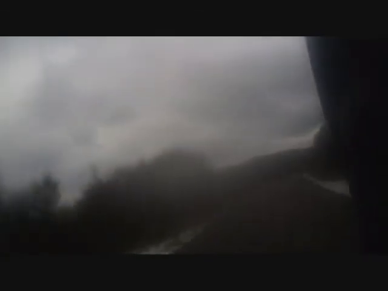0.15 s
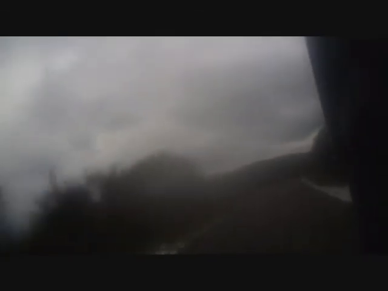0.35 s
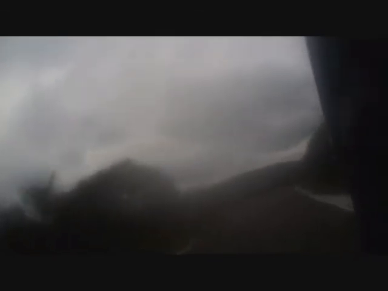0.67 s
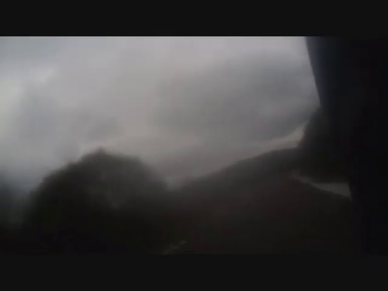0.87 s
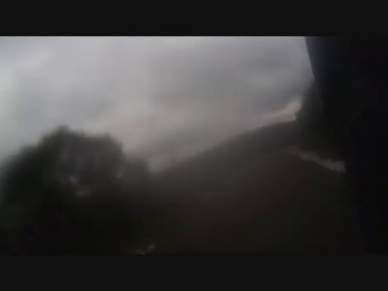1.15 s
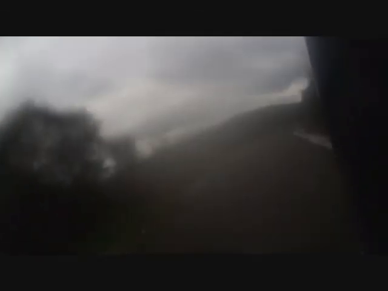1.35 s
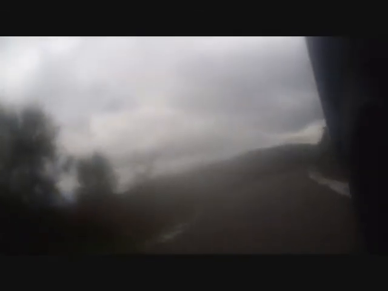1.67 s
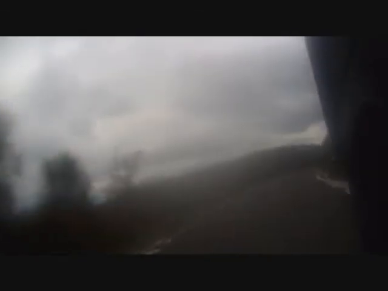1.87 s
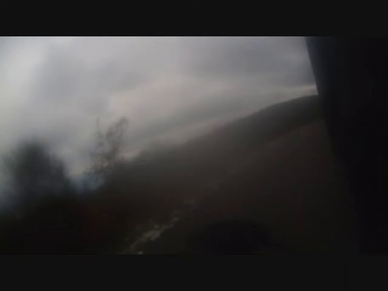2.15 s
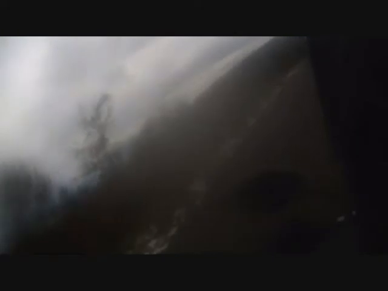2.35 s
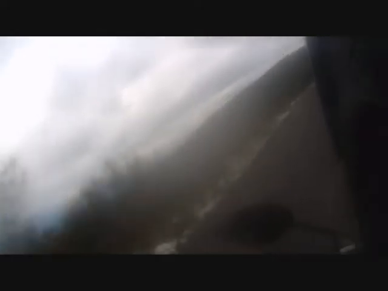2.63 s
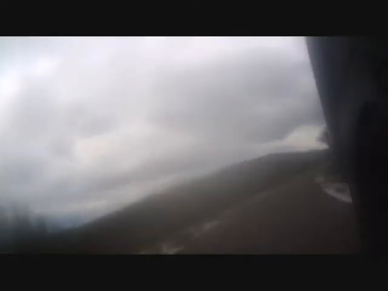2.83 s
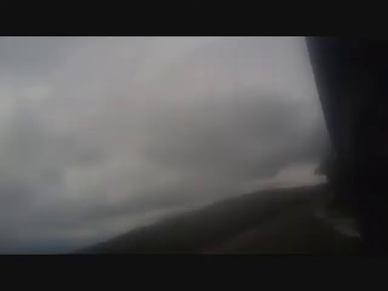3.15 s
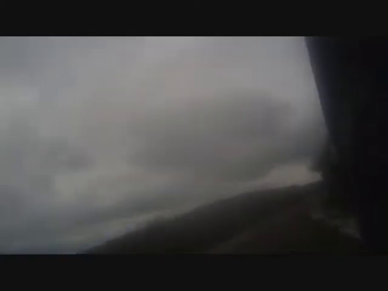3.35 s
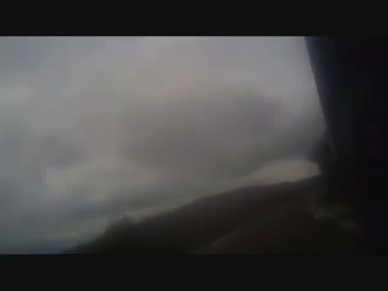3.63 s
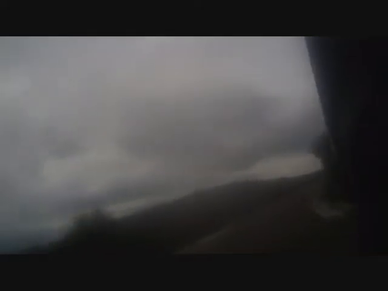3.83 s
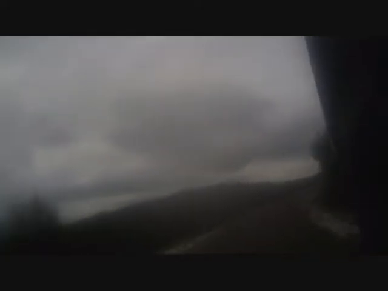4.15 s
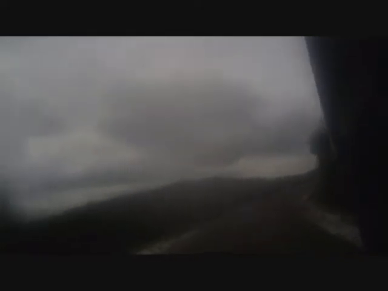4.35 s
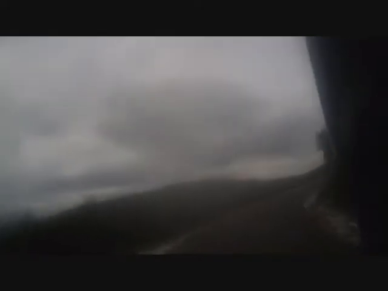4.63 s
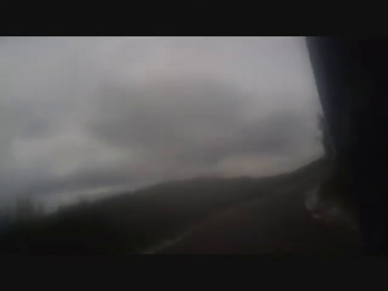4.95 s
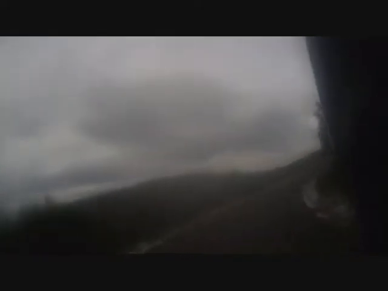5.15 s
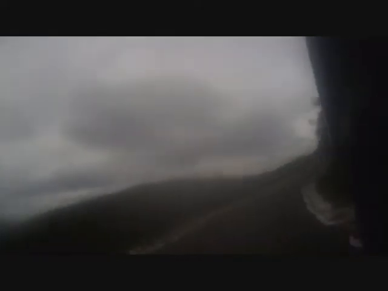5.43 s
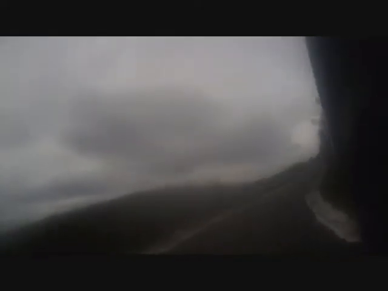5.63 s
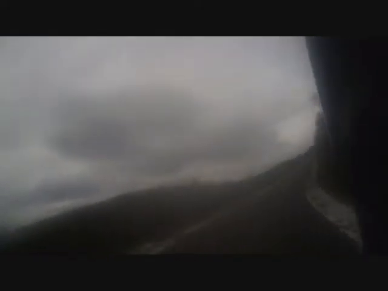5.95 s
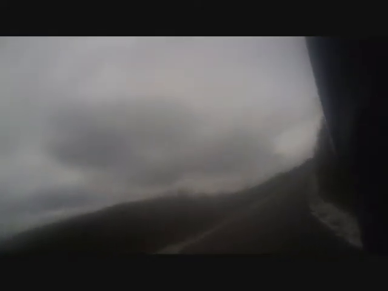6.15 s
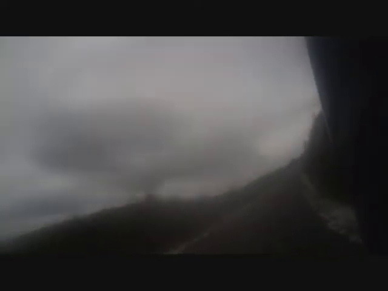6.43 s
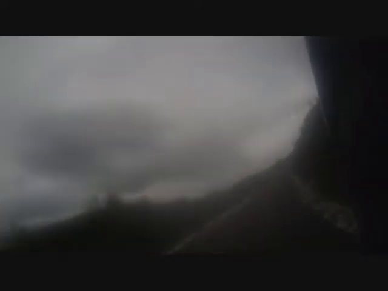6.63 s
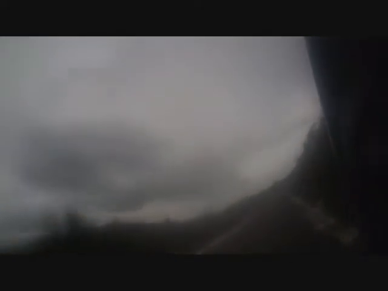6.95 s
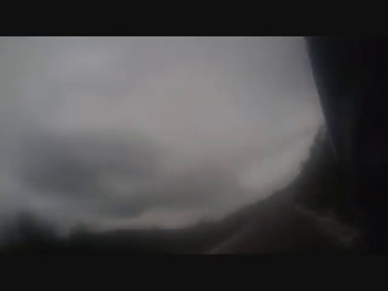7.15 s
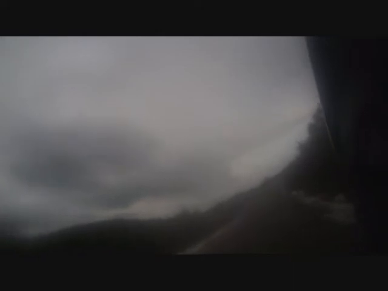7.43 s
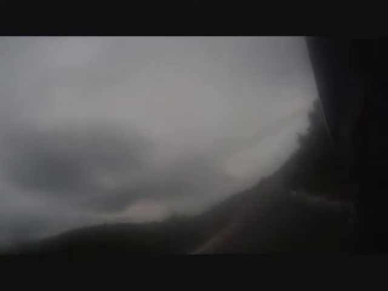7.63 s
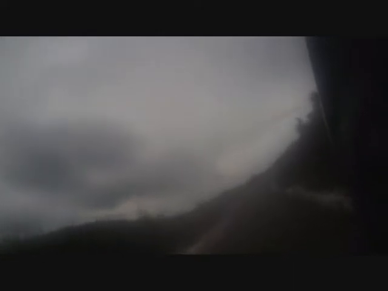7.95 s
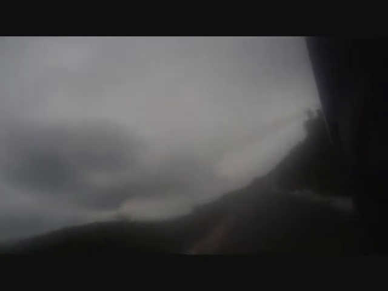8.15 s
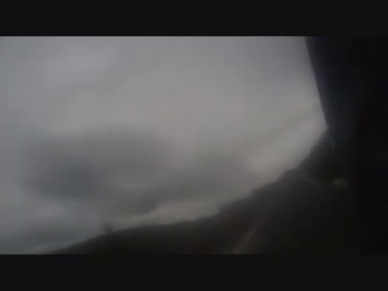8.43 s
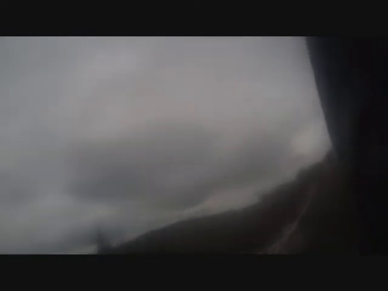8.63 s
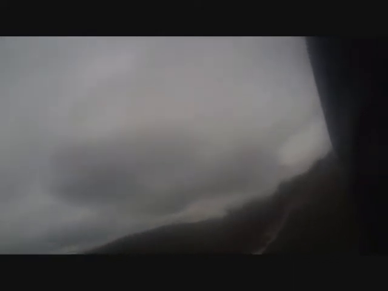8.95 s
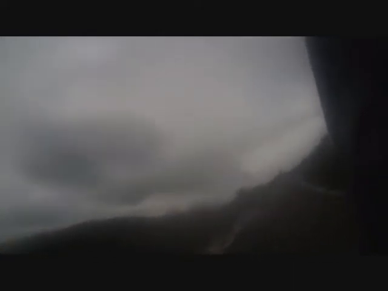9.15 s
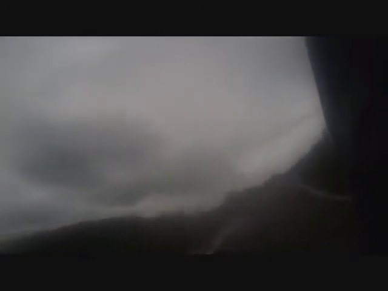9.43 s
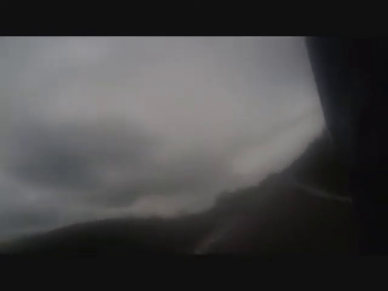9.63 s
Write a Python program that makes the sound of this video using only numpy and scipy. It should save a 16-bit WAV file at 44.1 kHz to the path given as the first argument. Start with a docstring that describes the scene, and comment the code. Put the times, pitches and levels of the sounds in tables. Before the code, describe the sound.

Heard from inside a small closed camera case on a motorcycle riding a wintry road, the sound is close, boxy, mono and narrow-band. Sleet dominates: very short, hollow clicks around 1.7 kHz, crumbly slush crackles and fine ticking spray. Clusters strike at 0.1-0.3 s, around 1 s, and at 1.3-1.9 s. A faint soft gust swells at 2.2-2.9 s among sparse ticks. Hits return near 2.9 s, with a hard crackling flurry at 3.5-3.8 s. From 4 to 5.9 s the knocks are lighter and scattered. They build from 6 s, with sharp snaps at 6.2 and 6.8 s, becoming a dense, loud, distorted rattle from 7 to 8.6 s. It then thins to isolated clicks and small crunches until 9.8 s. Far beneath, a low engine hum climbs slowly, with wavering frame drone, road rumble and gently growing airflow.

```python
"""Sleet strikes the case of a small closed camera, mounted on a motorcycle that gathers speed on a wintry road.
Ice pellets, crumbling clumps of slush and fine spray are short knocks that ring the case near 1.7 kHz;
they come thickest at about 7 to 8.5 s. Engine hum is made of sine waves, frame sway of one wandering sine,
and road rumble and airflow of coloured noise; all are faint beside the sleet.
The narrow-band recorder overloads on the hardest hits."""
import sys
import numpy as np
from scipy import signal
from scipy.fft import rfft, irfft, next_fast_len
from scipy.io import wavfile
from scipy.ndimage import map_coordinates

SR = 44100
rng = np.random.default_rng(int(sys.argv[2]) if len(sys.argv) > 2 else 0)


def waveform_to_disk(signal):
    """Save audio, clipped to [-1, 1], as 16-bit WAV at the path in sys.argv[1]."""
    frames = np.transpose(np.atleast_2d(signal))
    scaled = np.clip(frames, -1, 1) * 32767
    samples = np.round(scaled).astype(np.int16)
    wavfile.write(sys.argv[1], SR, samples)


N = 431277  # length of the scene in samples
RECORDER_HZ = 8000  # the recorder's own sample rate
TOP_HZ = 14700  # nothing is left above this at the output


def amp(db):
    """Turn decibels into a gain."""
    return 10 ** (np.asarray(db) / 20)


def unit(x):
    """Scale a sound to an rms of 1."""
    return x / np.sqrt(np.mean(x ** 2) + 1e-20)


def curve(rows):
    """Join (time [s], value) points with straight lines, one value per sample."""
    times, values = np.transpose(rows)
    return np.interp(np.arange(N) / SR, times, values)


def wobble(rate):
    """A smooth random curve through `rate` random points a second."""
    points = rng.standard_normal(int(N * rate / SR) + 4)
    return map_coordinates(points, [np.arange(N) * rate / SR])


def tone(hz):
    """A sine wave of rms 1 that follows a changing pitch."""
    return np.sqrt(2) * np.sin(2 * np.pi * np.cumsum(hz) / SR)


def filtered(x, response):
    """Multiply the spectrum of x by a response of frequency."""
    size = 2 * next_fast_len(N // 2 + SR // 4)  # spare room keeps the end from wrapping onto the start
    hz = np.fft.rfftfreq(size, 1 / SR)
    return irfft(rfft(x, size) * response(hz), size)[:N]


def gains(spectrum, hz):
    """Gain of a (frequency [Hz], level [dB]) spectrum, joined up on a log frequency axis."""
    table_hz, db = np.transpose(spectrum)
    return amp(np.interp(np.log(hz + 1), np.log(table_hz), db))


def noise(spectrum):
    """Noise of rms 1 with the colour of a spectrum."""
    return unit(filtered(rng.standard_normal(N), lambda hz: gains(spectrum, hz)))


def causal(gain):
    """The response with these gains that rings only after it is struck (minimum phase)."""
    cepstrum = irfft(np.log(gain))
    half = len(cepstrum) // 2
    cepstrum[1:half] *= 2
    cepstrum[half + 1:] = 0
    return np.exp(rfft(cepstrum))


def ringing_noise(centre_hz, width_hz):
    """Noise of rms 1 through one resonance, like a mode that is kept ringing."""
    def resonance(hz):
        damping = 1j * hz * width_hz
        return damping / (centre_hz ** 2 - hz ** 2 + damping)
    return unit(filtered(rng.standard_normal(N), resonance))


# How strongly the case rings at each pitch: (frequency [Hz], relative level [dB])
CASE_RESPONSE = [(300, -36), (970, -36.5), (1085, -22.5), (1240, -32), (1520, -2.5), (1700, 3), (1850, -8),
                 (2330, -30), (2490, -24), (2730, -41), (2980, -22), (3330, -24), (3530, -31.5),
                 (4000, -24.5)]


def case(hz):
    """Ringing response of the struck case, within the recorder's band."""
    return causal(gains(CASE_RESPONSE, hz)) * (hz < RECORDER_HZ / 2)


# Engine speed: (time [s], firing rate [Hz])
ENGINE_SPEED = [(0, 120.6), (1.5, 125), (2.8, 127.1), (4, 126.7), (5.2, 133.4), (6, 136.1), (7, 141.6),
                (8, 146.5), (9.78, 150)]


def firing_rate():
    """How many times a second the engine fires; this sets the pitch of its hum."""
    return curve(ENGINE_SPEED)


# Partial tones of the hum: (multiple of the firing rate, level [dB])
HUM_TONES = [(.5, -68), (1, -60.5), (2, -73.5)]


def engine_hum(waver_db=2.0):
    """Each firing pushes the air, so the engine hums at multiples of its firing rate."""
    firing_hz = firing_rate()
    hum = np.zeros(N)
    for multiple, db in HUM_TONES:
        hum += amp(db + waver_db * wobble(6)) * tone(multiple * firing_hz)
    return hum


# Sway of the frame on its mount: (time [s], level [dB])
FRAME_SWAY = [(0, -54.5), (0.8, -48.5), (1.2, -55), (2.0, -47), (2.6, -57), (2.92, -41.5), (3.15, -60.5),
              (3.9, -49.5), (4.8, -59.5), (5.15, -44.5), (5.4, -65), (6.2, -45.5), (6.75, -48.5),
              (7.3, -50), (8.4, -50), (8.92, -43), (9.55, -48.5), (9.78, -45.5)]


def frame_sway(frame_hz=58, wander_hz=3.5, waver_db=1.1):
    """The road sets the frame swaying at its own, slightly wandering pitch."""
    level_db = curve(FRAME_SWAY) + waver_db * wobble(7.1)
    return amp(level_db) * tone(frame_hz + wander_hz * wobble(6.7))


def air_level(start_db=-56.5, db_per_octave=12.5):
    """Base level in dB for air and road; it grows by db_per_octave as the engine speed doubles."""
    firing_hz = firing_rate()
    return start_db + db_per_octave * np.log2(firing_hz / firing_hz[0])


# Colour of the road rumble: (frequency [Hz], relative level [dB])
RUMBLE_COLOUR = [(15, -6), (38, -5), (55, 2), (72, 3), (95, -3), (150, -10), (400, -40)]


def road_rumble(above_base_db=2.0):
    """The road rumbles as low noise that grows with speed, as the airflow does."""
    return amp(air_level() + above_base_db) * noise(RUMBLE_COLOUR)


# Colour of the rushing air: (frequency [Hz], relative level [dB])
AIR_COLOUR = [(30, -0.5), (100, 9.5), (190, 9), (225, 10), (258, 16.5), (300, 6), (500, 3), (800, 2),
              (1080, 2), (1250, -2), (2500, -7.5), (3300, -1), (3900, -16.5)]


def air_rush(above_base_db=5, waver_db=1.9):
    """Turbulent air rushes past as noise that wavers and grows with speed."""
    return amp(air_level() + above_base_db + waver_db * wobble(13)) * noise(AIR_COLOUR)


def air_ringing(main_db=-49.0, waver_db=2.4, cavity_db=-52.5):
    """The airflow keeps the case's main mode and its upper cavity mode faintly ringing."""
    main = amp(main_db + waver_db * wobble(11)) * ringing_noise(1690, 150)
    cavity = amp(cavity_db) * ringing_noise(3270, 170)
    air_db = air_level()
    # the two levels above hold at the middle speed
    return (main + cavity) * amp(0.98 * (air_db - np.median(air_db)))


# Thickness of the fine spray between the pellets, before trims: (time [s], level [dB])
SPRAY_LEVEL = [(0.0, -38.5), (0.71, -57), (1.06, -42), (2.97, -48), (3.54, -45.5), (3.65, -33),
               (3.95, -46.5), (6.92, -36.5), (7.38, -32), (8.72, -40), (9.07, -43), (9.78, -36.5)]


def spray(per_second=220, scatter_db=4.5, flurry_db=4, trim_db=-2):
    """Many tiny droplets tick on the case, in flurries."""
    lands = rng.random(N) < per_second / SR
    size_db = scatter_db * np.minimum(rng.standard_normal(N), 2)
    size_db += flurry_db * np.minimum(wobble(25), 1)
    ticks = unit(filtered(lands * amp(size_db), case))
    return amp(curve(SPRAY_LEVEL) + trim_db) * ticks


def strays(per_second=16, above_spray_db=12.5, scatter_db=5, count=600):
    """(time [s], peak [dB]) of small pellets landing at random, heavier where the spray is thick."""
    where, chance = rng.random((2, count))
    times = where * N / SR
    db = np.interp(times, *np.transpose(SPRAY_LEVEL)) + above_spray_db
    db += scatter_db * np.clip(rng.standard_normal(count), -2, 2)
    lands = chance < per_second * N / SR / count  # keeps per_second of them on average
    return list(np.column_stack([times, db])[lands])


# Clumps of slush that crumble against the case: (start time [s], length [s], level before trims [dB])
SLUSH_CLUMPS = [(0.05, 0.058, -23), (0.209, 0.047, -18), (0.937, 0.059, -24), (1.334, 0.031, -18),
                (1.512, 0.022, -14.5), (1.908, 0.0092, -13), (2.871, 0.051, -27.5), (2.95, 0.018, -20.5),
                (3.278, 0.035, -26.5), (3.489, 0.023, -17.5), (3.553, 0.02, -12.5), (3.601, 0.029, -16.5),
                (3.753, 0.056, -13), (3.94, 0.027, -23), (4.072, 0.075, -29), (4.505, 0.021, -24),
                (4.664, 0.028, -25.5), (4.774, 0.043, -28.5), (5.408, 0.02, -13), (5.5, 0.048, -29.5),
                (5.728, 0.05, -31), (6.031, 0.035, -17), (6.193, 0.015, -14), (6.225, 0.026, -20.5),
                (6.457, 0.037, -18), (6.756, 0.024, -20.5), (6.93, 0.026, -15), (7.026, 0.057, -18),
                (7.147, 0.02, -15.5), (7.195, 0.03, -15.5), (7.259, 0.025, -18.5), (7.303, 0.027, -13.5),
                (7.375, 0.016, -7), (7.41, 0.026, -16), (7.459, 0.064, -27.5), (7.56, 0.044, -16.5),
                (7.659, 0.056, -15.5), (7.73, 0.027, -19), (7.79, 0.024, -15), (7.852, 0.016, -15),
                (8, 0.017, -14.5), (8.036, 0.028, -9), (8.388, 0.02, -13.5), (8.458, 0.062, -25.5),
                (8.546, 0.036, -15.5), (8.651, 0.037, -16), (8.727, 0.079, -20.5), (9.02, 0.044, -10.5),
                (9.385, 0.046, -28.5), (9.48, 0.082, -29.5), (9.589, 0.023, -14), (9.66, 0.064, -31)]


def clumps(every_s=.005, peak_db=5.5, spread_db=4.5, taper_db=5.5, max_db=-6, count=24):
    """(time [s], peak [dB]) of each clump's fragments: an uneven run, on average heaviest in the middle."""
    fragments = []
    for start_s, length_s, level_db in SLUSH_CLUMPS:
        late, big = rng.standard_normal((2, count))
        after_s = every_s * (np.arange(count) + (1 + np.tanh(late / 2)) / 2)
        weaker_db = taper_db * (2 * after_s / length_s - 1) ** 2  # most at the two ends
        db = level_db + peak_db - weaker_db + spread_db * np.clip(big, -2, 1)
        db = np.minimum(db, max_db)  # soft slush can hit no harder
        run = np.column_stack([start_s + after_s, db])
        fragments += list(run[after_s < length_s])
    return fragments


def pellets(impacts, spot_db=3, spot_hz=120, hard_db=2, heavy=.2, crumble=.12, slush=.45,
            rise_s=0.001, fall_s=0.00095, early_s=.0001, size=2048, lead_count=256):
    """Each pellet starts to crush, hits home and crumbles; hardness, weight and landing spot set the colour."""
    t = (np.arange(size) - lead_count) / SR  # zero when the pellet hits home
    hz = np.fft.rfftfreq(size, 1 / SR)
    upper = np.interp(hz, [1800, 3000], [0, 1])
    band = 1 / (1 + (2 * hz / RECORDER_HZ) ** 20)
    out = np.zeros(N + size)
    for s, peak_db in impacts:
        hardness = np.clip(rng.standard_normal(), -2, 2)
        # slushy pellets take longer to crush
        crush = np.exp(np.minimum(t / rise_s, -t / fall_s) * np.exp(slush * hardness))
        force = crumble * crush * rng.standard_normal(size)
        force[lead_count] += 1
        # the landing spot favours some pitches over others
        spot = spot_db * map_coordinates(rng.standard_normal(size // 8), [hz / spot_hz])
        # light, icy pellets excite the upper modes most
        bright_db = hard_db * hardness - heavy * max(peak_db + 1.5, 0)
        gain = gains(CASE_RESPONSE, hz) * amp(spot + bright_db * upper) * band
        ring = irfft(rfft(force) * causal(gain + 1e-4))[:size // 2]  # the small floor keeps the log finite
        start = np.clip(round((s - early_s) * SR) - lead_count, 0, N)
        out[start:][:len(ring)] += amp(peak_db) * ring / np.abs(ring).max()
    return out[:N]


# Ice pellets that hit the case squarely: (time [s], peak level [dB])
ICE_PELLETS = [(0.1041, 0), (0.2141, -0.5), (0.2398, 2), (0.2449, 0), (0.2957, -16), (0.9404, 0.5),
               (0.9818, 7), (1.0142, -1), (1.1068, -15.5), (1.3348, -11.5), (1.3479, 2.5), (1.5292, -0.5),
               (1.6687, -6.5), (1.7969, -19), (1.9178, 5.5), (1.9288, -1), (2.352, -13), (2.4843, -21.5),
               (2.524, -18.5), (2.7027, -12.0), (2.8955, 0), (2.9167, -2), (2.9481, -5.5), (3.2943, -10),
               (3.5012, -4.0), (3.5584, -7), (3.5711, 8.5), (3.6123, -1), (3.6784, -6), (3.7745, 7),
               (3.7923, 4), (3.9507, -11), (4.0559, -20.5), (4.0705, -8), (4.0988, -7), (4.1319, 1.5),
               (4.2624, -6), (4.3763, -13.5), (4.4615, -16.5), (4.5188, -11.5), (4.6609, -8.5),
               (4.6842, -9), (4.7767, -7.0), (4.8024, -10), (4.9015, -16.5), (4.926, -9), (5.0816, -17),
               (5.188, -12.5), (5.1982, -8.5), (5.3076, -13), (5.4178, -3), (5.4773, -14), (5.501, -14.5),
               (5.5394, -9), (5.72, -14), (5.77, -12.0), (5.8953, -7.5), (6.0675, -4), (6.085, 2),
               (6.1005, -5.5), (6.2057, 5), (6.2113, 6), (6.2167, 6), (6.2427, 2), (6.3443, -20),
               (6.4283, -3.0), (6.4859, -13), (6.54, 0), (6.576, -11), (6.6581, -19.5), (6.7632, 3.5),
               (6.7795, -1.5), (6.8018, -0.5), (6.9327, -4.5), (6.9448, -3.5), (7.0532, -7.5), (7.0653, -3),
               (7.1459, -6.5), (7.1625, -1.5), (7.1679, 3.5), (7.1806, 8), (7.1909, 4), (7.2641, 4.5),
               (7.2853, 5), (7.2916, -2.5), (7.2981, 3.5), (7.3147, -4.0), (7.3917, 9.5), (7.4038, 7),
               (7.4358, -2.5), (7.4825, -13), (7.5158, -2.5), (7.5567, -4), (7.5733, -7.5), (7.585, -8),
               (7.6542, -3), (7.6725, -10.0), (7.6873, -3.5), (7.6974, 6), (7.7474, 6), (7.7769, 3.5),
               (7.7845, 6.5), (7.8093, -10), (7.8579, -2), (7.8677, -3.5), (7.9483, -4), (8.0158, 4),
               (8.0287, 6), (8.05, 4), (8.0556, 3), (8.086, -3), (8.1191, 0.5), (8.1319, 9.5), (8.1382, 1),
               (8.1467, 1.5), (8.195, 3.5), (8.2027, 4), (8.2482, 2.5), (8.2561, -3.5), (8.3648, 2),
               (8.3705, 1), (8.3786, 3), (8.3838, 0), (8.3996, 0.5), (8.4741, -3.5), (8.4844, -10.0),
               (8.4999, -3), (8.5163, -12), (8.5618, 3.5), (8.578, -5), (8.6803, -4.5), (8.7998, -1.5),
               (8.908, -10.5), (8.9518, -12), (9.044, -2.5), (9.0503, -1.5), (9.145, -18.5), (9.2457, -18),
               (9.3275, -11.5), (9.4012, -16.5), (9.5506, -11), (9.5986, -1.5), (9.688, -9.5),
               (9.7047, -15.5)]


def sleet():
    """Square hits of ice, slush fragments and strays all knock on the same case."""
    return pellets(list(ICE_PELLETS) + clumps() + strays())


def crumbs(hits, spread_s=0.0025, lag_s=0.0024, per_second=500, level_db=-19):
    """Small crumbs break off the pellets and land close around them, mostly just after."""
    after_s = np.arange(SR // 10) / SR - .05
    cloud = np.exp(-((after_s - lag_s) / spread_s) ** 2 / 2)
    power = signal.fftconvolve(np.minimum(hits ** 2, 1), cloud / cloud.sum(), "same")
    nearby = np.sqrt(np.abs(power))
    lands = (rng.random(N) < per_second / SR) * rng.standard_normal(N)
    return amp(level_db) * nearby * unit(filtered(lands, case))


# A brief side gust: (time [s], level [dB])
GUST_LEVEL = [(2.2, -72.5), (2.35, -47), (2.7, -48), (2.88, -77)]
# Colour of the gust: (frequency [Hz], relative level [dB])
GUST_TINT = [(150, -9.5), (300, 1), (900, -5.5), (1400, -3), (2200, -13.5), (3500, -22)]


def side_gust():
    """A brief gust from the side swells and fades as coloured noise."""
    return amp(curve(GUST_LEVEL)) * noise(GUST_TINT)


def scene():
    """Add up everything as heard inside the case."""
    motorcycle = engine_hum() + frame_sway() + road_rumble()
    air = air_rush() + air_ringing() + side_gust()
    hits = sleet()
    return (motorcycle + air + spray() + hits + crumbs(hits))[None]


def record(dry, edge_hz=3890, drive_db=-0.3737, knee=9, lopsided=0.049, treble_hz=13000):
    """The recorder saturates lopsidedly at its low sample rate; peaks between samples clip at the output."""
    slow = signal.resample_poly(dry[0], RECORDER_HZ, SR)
    ceiling = 1 + lopsided * np.sign(slow)  # a little higher for positive peaks
    slow = slow / (1 + np.abs(slow / ceiling) ** knee) ** (1 / knee)
    padded = np.pad(slow, (0, 10 * RECORDER_HZ - len(slow)))  # fill up to 10 s
    wide = signal.resample(padded, 10 * SR)[:N]
    narrow = filtered(wide, lambda hz: 1 / (1 + np.minimum(hz / edge_hz, 2) ** 60))
    clipped = np.clip(amp(drive_db) * narrow, -1, 1)
    return filtered(clipped, lambda hz: (hz < TOP_HZ) / (1 + (hz / treble_hz) ** 12))[None]


dry = scene()
out = record(dry)
waveform_to_disk(out)
```